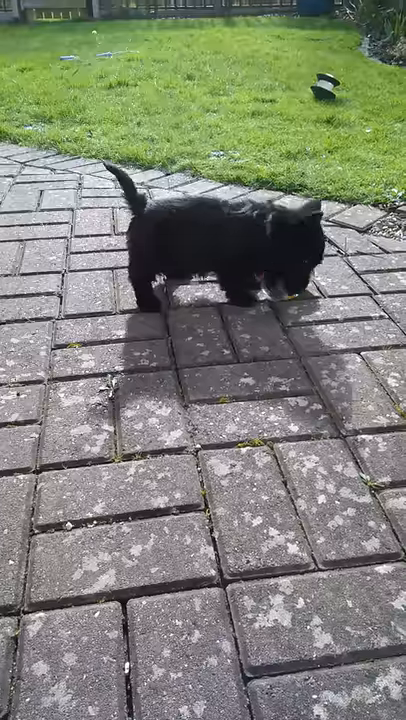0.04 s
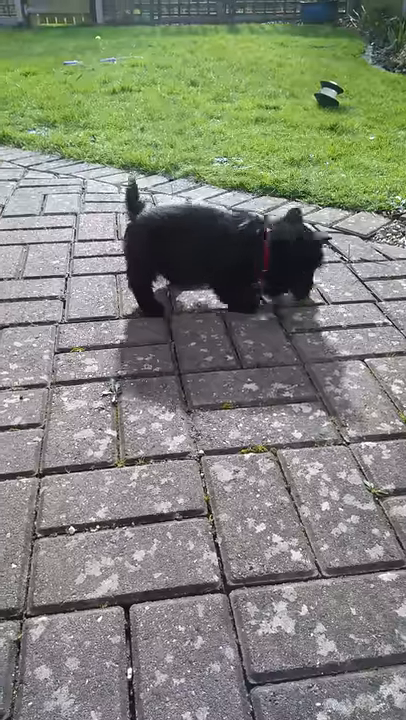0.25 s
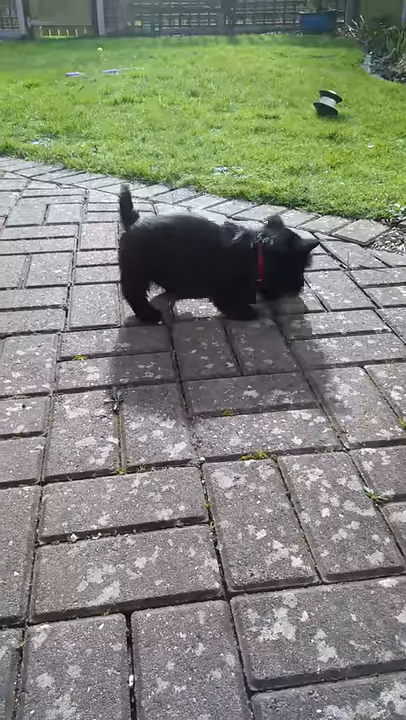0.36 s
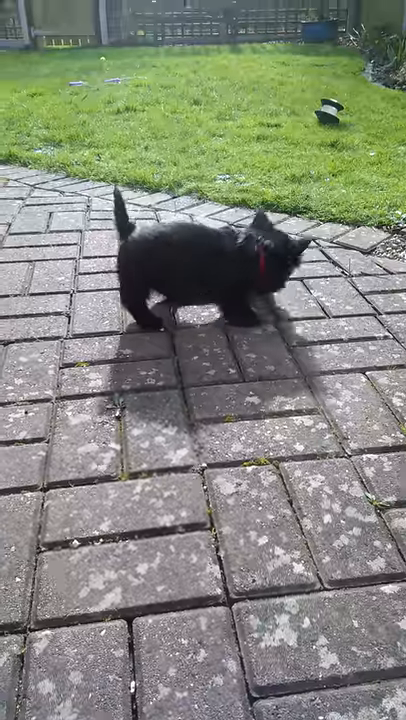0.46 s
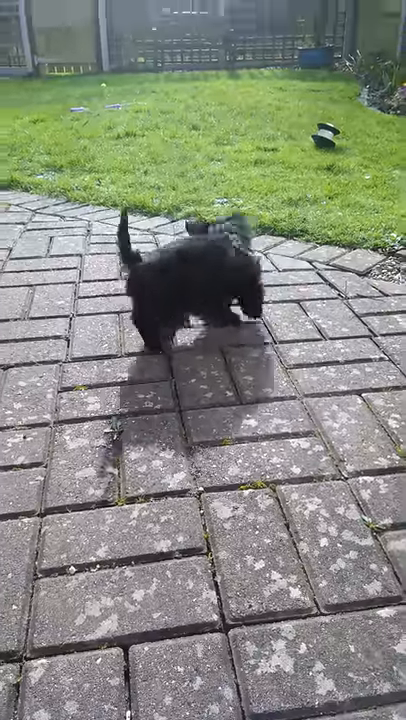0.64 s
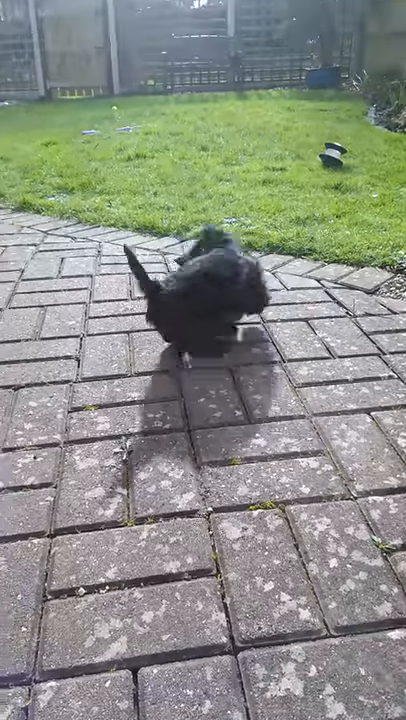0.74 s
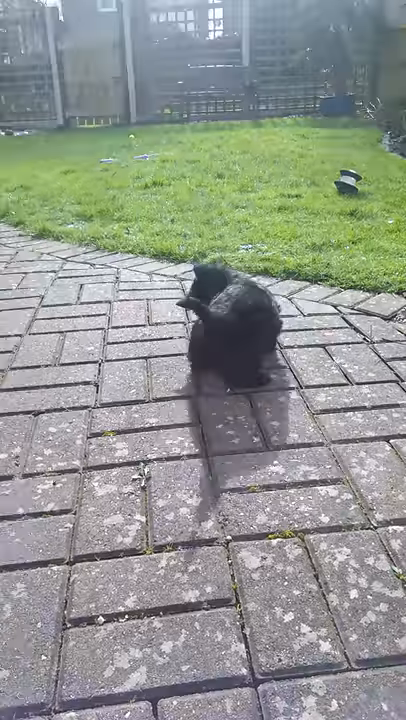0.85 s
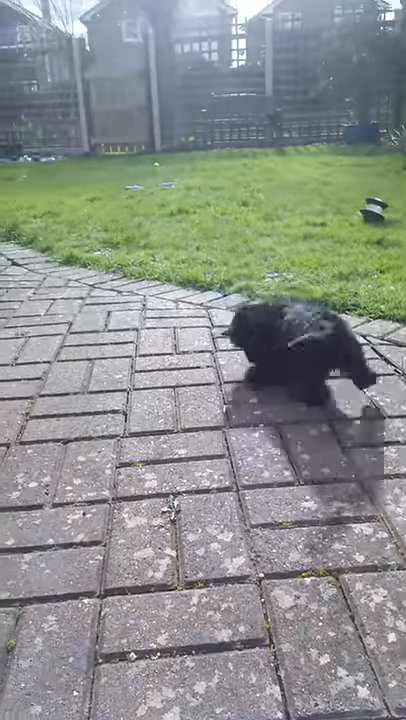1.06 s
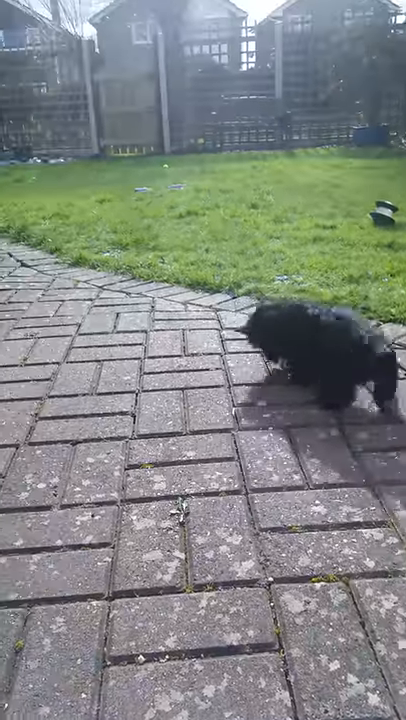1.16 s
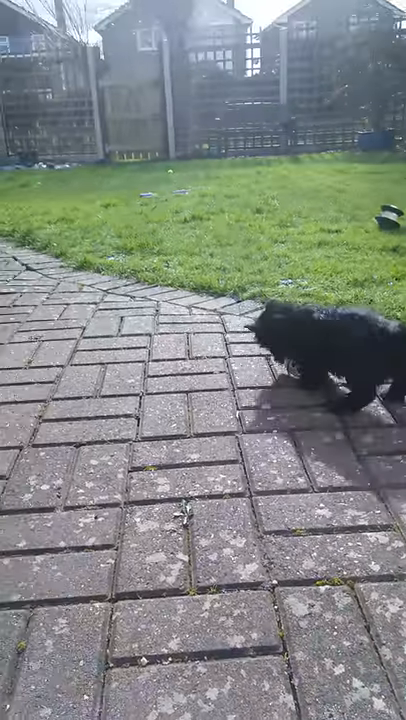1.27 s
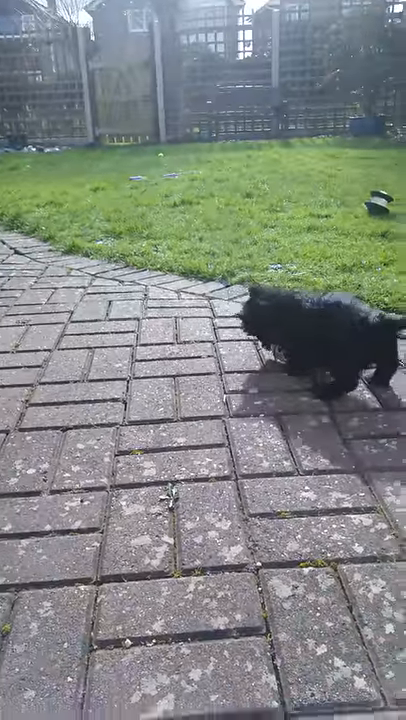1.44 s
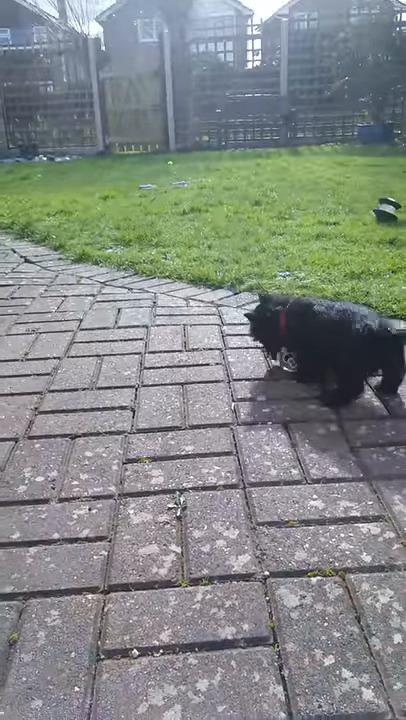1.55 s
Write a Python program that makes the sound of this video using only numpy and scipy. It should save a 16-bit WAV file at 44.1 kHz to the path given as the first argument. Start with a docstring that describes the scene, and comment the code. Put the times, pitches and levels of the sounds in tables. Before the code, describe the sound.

Close up in a garden, a metal can knocks and judders over gritty brick, pushed by a puppy. The rattling eases and resumes with small high clinks and soft scuffs, ending with a hollow bump and a short ping.

```python
"""Puppy shoving a can over brick

Close up, a metal can knocks and judders in stick-slip scrapes on a patio. Grit cracks under its rim,
a small loose metal piece clinks, soft scuffs follow, then a hollow bump and a ping.
Wall and garden fences give a short echo; a limiter squeezes the loudest blows."""
import sys
import numpy as np
from scipy import signal
from scipy.fft import rfft, irfft
from scipy.io import wavfile
from scipy.ndimage import uniform_filter1d, minimum_filter1d

SR = 44100
rng = np.random.default_rng(int(sys.argv[2]) if len(sys.argv) > 2 else 0)


def int16_out(signal):
    """Quantize to a 16-bit WAV file."""
    q = np.round(np.clip(np.atleast_2d(signal).T, -1, 1) * 32767)
    wavfile.write(sys.argv[1], SR, q.astype(np.int16))


N = 70560
RING_TIME_S = np.arange(SR // 2) / SR

# Modes of can, loose piece, bump and ping. Each row: frequency in Hz, level in dB, T60 in seconds.
CAN_MODES = [(322, -20.5, 0.13), (651.5, -2, 0.16), (695.8, -6.5, 0.17), (814, -13, 0.075),
             (921, 5.5, 0.14), (998, -7.5, 0.14), (1154, -23.5, 0.4), (1364, -0.5, 0.16), (1451, 3.5, 0.18),
             (1643.7, 0.5, 0.15), (1695, 1.5, .12), (2032, -2, 0.19), (2750, -25.5, 0.18), (3050, 0, 0.27),
             (3865, 4.5, 0.19), (4140, -12, 0.067), (4080, 2.5, 0.17), (4760, 4, .12), (5200, -6.5, 0.072)]
CLINK_MODES = [(4910, 3, 0.044), (6840, -9, 0.45), (7280, -5, 0.07), (8500, -9, .1), (14000, -11, .15)]
BUMP_MODES = [(359, -12.5, 0.065), (667, -16, 0.099), (922, 0.5, 0.045), (1100, 5.5, 0.014),
              (1185, -13, 0.15), (1520, -19, 0.059), (2100, -5, 0.029), (2430, -21.5, 0.097),
              (2750, -12, .06), (3600, -17, 0.063), (3720, -20, .06), (3950, -20, 0.087),
              (5140, -17.5, .05)]
PING_MODES = [(664, -26, 0.046), (990, -22, 0.058), (1400, -1.5, 0.05), (1457, -12, 0.18),
              (1620, -9, 0.027), (2070, -16.5, 0.043), (2270, -6.5, 0.017), (2600, -22, 0.11),
              (4800, -29, 0.03)]
# Noise spectra. Each row: frequency in Hz, relative density in dB.
WASH_SPECTRUM = [(120, -27), (250, -29), (340, -3), (520, -7), (850, 7.5), (1100, -2), (1400, 5.5),
                 (1750, 2), (2400, -8.5), (4700, -13), (7000, -15.5), (8200, -19.5), (9500, -17.5),
                 (11800, -23), (14100, -16), (15500, -26.5)]  # the can's dense weak modes
GRIT_SPECTRUM = [(1500, -13), (3000, -6.5), (3800, 0.5), (6000, -5), (8500, -0.5), (12000, -1),
                 (15500, 0.5)]
CLICK_SPECTRUM = [(1200, 2), (3500, 1), (5000, 12), (6700, 4), (8400, 11), (10500, 9.5), (12000, 3),
                  (15500, 2.5)]
SCUFF_SPECTRUM = [(50, -52.5), (150, -8), (260, -9), (370, 4), (560, -3.5), (750, -14.5), (1400, -14.5),
                  (3000, -45), (15000, -36.5)]
ECHO_SPECTRUM = [(100, 10), (700, -8), (1500, -11.5), (5000, -8.5), (15000, -10)]
AIR_SPECTRUM = [(30, 1), (150, -4), (600, 8), (2000, 8), (15000, -17.5)]
# Low, mid and treble bands of the can. Each row: lower and upper edge in Hz, wash against modes in dB,
# wash T60 in seconds.
CAN_BANDS = [(60, 1200, -9, 0.16), (1197, 2900, 3, 0.14), (2970, 16000, 10.5, 0.13)]
# Blows on the can. Each row: start in seconds, low, mid and treble level in dB, share left ringing,
# frequency favoured by the contact point in Hz, its boost in dB, wash offset in dB.
KNOCKS = [(.095, -47, -47.5, -79, 0.32, 880, 5.5, -6), (.181, -34.5, -42, -68, 0.6, 650, -8, 5),
          (.187, -26, -28.5, -51, 1, 918, 2, -12), (.201, -16.5, -21.5, -40, 1, 918, 8, -14),
          (.217, -20, -22, -26.5, 0.9, 1648, 12, -9), (.223, -16, -18, -30, 1, 1648, 17, 3),
          (.232, -13.5, -12.5, -33, 1, 918, 1, 1.5), (.260, -12, -14, -28, 1, 918, 15, -2.5),
          (.268, -5.5, -17.5, -26.5, 0.86, 974, 30, -15.5), (.284, -22.5, -20.5, -36, 0.35, 980, -7, 6),
          (.331, -15.5, -18, -33, 1, 918, 0, -8.5), (.347, -12.5, -30, -54, 0.9, 918, 27, -8),
          (.367, -9, -10.5, -16, 1, 1689, 20, -2), (.378, -11, -10, -20, 1, 1010, 12.5, -4.5),
          (.392, -4, -23, -20, 0, 985, 20, -16), (.411, -16, -16.5, -23, 0.5, 1760, 2, 16.5),
          (.436, -9, -7.5, -16, 0.9, 647, 15, 0), (.445, -43, -9.5, -12, 0.45, 1697, 20, -8),
          (.453, -27, -17, -35, 0.5, 670, -6, 12), (.469, -16.5, -30, -34, 0.1, 1452, 9, -1.5),
          (.489, -15, -21.5, -45, 0.76, 918, 21, -2.5), (.517, -17, -28, -43, 0.07, 810, 16, -1),
          (.560, -20.5, -38.5, -59, 0.84, 815, 16.5, 11.5), (.605, -14, -32, -34.5, 1, 918, 12.5, 1.5),
          (.629, -21.5, -40, -37, 0.9, 1170, 1, 7), (.652, -18, -27, -40, 1, 918, 9, -26),
          (.667, -22, -31, -49, 0.8, 940, 28, -27), (.691, -53, -25.5, -41, 0.95, 1648, 9, -2),
          (.747, -21, -27.5, -46, 1, 918, 1.5, -8), (.764, -27.5, -48, -35.5, 1, 1452, 10, 0.5),
          (.881, -18, -37, -42.5, .95, 918, -3, -4.5), (.904, -17, -38, -51, 1, 875, 24, 4.5),
          (.924, -27.5, -25, -41, 1, 1380, 10, -0.5), (.945, -27.5, -25, -26.5, 1, 1370, 11, 11),
          (1.012, -18, -40, -36, .7, 646, 8, 12), (1.021, -21.5, -24.5, -48, .3, 1170, 5, 8),
          (1.046, -13.5, -17, -26.5, 0.67, 1005, 16.5, -1), (1.072, -24, -26, -32.5, 0.7, 655, 24, 11),
          (1.092, -21, -38, -41, 0.55, 650, 23, 6), (1.125, -34, -16.5, -28.5, 0.09, 1678, 26, -4.5),
          (1.449, -52, -48, -58, 0, 1648, 0, 4.5), (1.509, -53, -54, -66, 0.1, 918, 1, -5)]
# Rim on brick. Each row: start and length in seconds, low, mid and treble level in dB,
# level change along the scrape in dB.
SCRAPES = [(0.204, 0.067, -27, -21.5, -29.5, -6), (0.336, 0.074, -21, -21, -32.5, 1),
           (0.439, 0.086, -26, -22, -37, 5), (.53, 0.18, -27.5, -28, -38.5, -10.5),
           (0.747, 0.031, -26.5, -24, -39, -29), (0.887, .11, -34.5, -33, -43, -2.5),
           (0.998, 0.12, -27.5, -27.5, -37.5, -10), (1.117, 0.099, -53, -38.5, -44, 3)]
# Grit under the rim. Each row: start in seconds, level in dB, T60 in seconds.
GRIT_CRACKS = [(.216, -29, .04), (.232, -33, .03), (.259, -27, .025), (.284, -38.5, .025),
               (.320, -31.5, .012), (.368, -31, .05), (.378, -31.5, .04), (.445, -38, .05),
               (.747, -28, .06), (1.4094, -26, .034)]
# Touches of the loose piece. Each row: start in seconds, click and ring level in dB, favoured Hz.
CLINKS = [(0.93, -39, -60, 14000), (0.9441, -20, -25.5, 7350), (.970, -29.5, -36.5, 6832),
          (1.001, -36, -37, 6832), (1.0308, -20.5, -28.5, 6832), (1.071, -34, -33, 7350),
          (1.089, -30.5, -48, 7350), (1.1093, -29.5, -30.5, 7350), (1.127, -54, -42, 7350),
          (1.148, -38, -52, 7350), (1.167, -40, -54, 14000), (1.184, -41.5, -60, 5010),
          (1.201, -44, -52.5, 5010), (1.214, -39, -47, 5010), (1.228, -49, -94, 5010),
          (1.322, -50, -68, 5010)]
# Rubs on the paving. Each row: start and length in seconds, level in dB.
SCUFFS = [(.975, 0.048, -36), (1.166, 0.071, -36), (1.455, 0.099, -46.5), (1.52, 0.092, -46)]


def undb(db):
    return 10 ** (np.asarray(db) / 20)


def rms(x):
    return np.sqrt(np.mean(x ** 2) + 1e-18)


def decay(t60_s):
    return np.exp(-np.log(1000) * RING_TIME_S / np.maximum(t60_s, 1e-3))


def trapezoid(length_s, edge_s):
    return np.clip(np.minimum(RING_TIME_S, length_s - RING_TIME_S) / edge_s, 0, 1)


def at_level(x, db):
    """Scales x so its first 10 ms have the given RMS level."""
    return x * undb(db) / rms(x[:SR // 100])


def noise(spectrum, low_hz=0, high_hz=SR, size=len(RING_TIME_S)):
    """Shaped noise of unit RMS."""
    bins_hz = np.fft.rfftfreq(size, 1 / SR) + 1
    hz, db = np.array(spectrum, float).T
    gain = undb(np.interp(np.log(bins_hz), np.log(hz), db))
    in_band = (bins_hz > low_hz) & (bins_hz < high_hz)
    x = irfft(rfft(rng.standard_normal(size)) * gain * in_band, size)
    return x / rms(x)


def add(out, start_s, x):
    i = max(int(start_s * SR), 0)
    out[i:i + len(x)] += x[:max(N - i, 0)]


def can_rings(pitch_spread, wash_db, favoured_hz=0, boost_db=0, boost_width_hz=44.7, scatter_db=2.5):
    """One tap's response per band: clear modes, detuned as the can is pressed, in a wash of weak ones."""
    hz, db, t60_s = np.array(CAN_MODES).T
    db = db + boost_db * np.exp(-((hz - favoured_hz) / boost_width_hz) ** 2)
    db += scatter_db * rng.standard_normal(len(hz))
    bent_hz = hz * (1 + pitch_spread * rng.standard_normal(len(hz)))
    modes = undb(db)[:, None] * np.sin(2 * np.pi * bent_hz[:, None] * RING_TIME_S) * decay(t60_s[:, None])
    modes[::2] *= -1
    rings = []
    for low_hz, high_hz, band_wash_db, wash_t60_s in CAN_BANDS:
        clear = modes[(hz >= low_hz) & (hz < high_hz)].sum(0)
        wash = noise(WASH_SPECTRUM, low_hz, high_hz) * decay(wash_t60_s)
        rings.append(at_level(clear, 0) + at_level(wash, band_wash_db + wash_db))
    return rings


def knocks(contact_s=0.0013, damped_t60_s=0.044):
    """Each blow rings the can; brick and muzzle quickly damp part of the ring."""
    out = np.zeros(N)
    attack = np.minimum(RING_TIME_S / contact_s, 1)
    for start_s, *bands_db, ringing_share, favoured_hz, boost_db, wash_db in KNOCKS:
        envelope = attack * (ringing_share + (1 - ringing_share) * decay(damped_t60_s))
        rings = can_rings(pitch_spread=0.0066, wash_db=wash_db, favoured_hz=favoured_hz, boost_db=boost_db)
        add(out, start_s, sum(at_level(ring * envelope, db) for ring, db in zip(rings, bands_db)))
    return out


def scrapes(slips_per_s=420, scatter_db=4.5):
    """The rim sticks and slips on brick: a burst of uneven taps into the can."""
    out, size = np.zeros(N), len(RING_TIME_S)
    for start_s, length_s, *bands_db, change_db in SCRAPES:
        slips = rng.random(size) < slips_per_s / SR
        strength = undb(scatter_db * rng.standard_normal(size))
        trend = undb(change_db * np.minimum(RING_TIME_S / length_s, 1))
        force = slips * strength * trapezoid(length_s, edge_s=0.007) * trend
        for ring, db in zip(can_rings(pitch_spread=0.017, wash_db=2), bands_db):
            judder = signal.fftconvolve(force, ring)
            add(out, start_s, judder * undb(db) / rms(judder[:int(length_s * SR)]))
    return out


def grit(tail_db=-13, tail_t60_s=0.16):
    """Grit cracks under the rim: bright bursts with a short sandy tail."""
    out = np.zeros(N)
    for start_s, db, t60_s in GRIT_CRACKS:
        envelope = decay(t60_s) + undb(tail_db) * decay(tail_t60_s)
        add(out, start_s, at_level(noise(GRIT_SPECTRUM) * envelope, db))
    return out


def clinks(click_t60_s=0.027, tail_db=-18, tail_t60_s=0.13, boost_db=12, ring_s=0.041, fade_s=0.013):
    """The loose piece clicks and gives a thin high ring, cut short after a brief set time."""
    out = np.zeros(N)
    click_envelope = decay(click_t60_s) + undb(tail_db) * decay(tail_t60_s)
    fade_out = np.clip((ring_s - RING_TIME_S) / fade_s, 0, 1)
    for start_s, click_db, ring_db, favoured_hz in CLINKS:
        ring = 0
        for hz, db, t60_s in CLINK_MODES:
            favoured = abs(hz / favoured_hz - 1) < 0.04
            tone = np.sin(2 * np.pi * hz * (start_s + RING_TIME_S))
            ring += undb(db + boost_db * favoured) * tone * decay(t60_s)
        click = noise(CLICK_SPECTRUM) * click_envelope
        add(out, start_s, at_level(click, click_db) + at_level(ring * fade_out, ring_db))
    return out


def scuffs():
    """Dull, soft rubs on the paving."""
    out = np.zeros(N)
    for start_s, length_s, db in SCUFFS:
        add(out, start_s, undb(db) * noise(SCUFF_SPECTRUM) * trapezoid(length_s, edge_s=0.013))
    return out


def lone_knock(modes, start_s, level_db, contact_s=0.0017, crack_db=-11, crack_t60_s=0.096):
    """One clean blow: a few modes and a brief crack."""
    out = np.zeros(N)
    ring = sum(undb(db) * np.sin(2 * np.pi * (hz * RING_TIME_S + rng.random())) * decay(t60_s)
               for hz, db, t60_s in modes)
    crack = noise(WASH_SPECTRUM) * decay(crack_t60_s)
    attack = np.minimum(RING_TIME_S / contact_s, 1)
    blow = (at_level(ring, 0) + at_level(crack, crack_db)) * attack
    add(out, start_s, at_level(blow, level_db))
    return out


def garden_echo(x, level_db=-15, t60_s=0.39, delay_s=0.013):
    """Scattered echo from house wall and fences."""
    tail = noise(ECHO_SPECTRUM) * decay(t60_s) * (RING_TIME_S > delay_s)
    return undb(level_db) * signal.fftconvolve(x, tail / np.linalg.norm(tail))[:N]


def scene(mic_low_cut_hz=203, air_db=-76.5):
    """Close sounds and their echo through a microphone with little bass, over faint air."""
    near = knocks()
    near += lone_knock(BUMP_MODES, start_s=1.2865, level_db=-20.5)
    near += lone_knock(PING_MODES, start_s=1.3835, level_db=-21.5)
    near += scrapes() + grit() + clinks() + scuffs()
    low_cut = signal.butter(3, mic_low_cut_hz, "high", fs=SR, output="sos")
    thin = signal.sosfilt(low_cut, near + garden_echo(near))
    air = undb(air_db) * noise(AIR_SPECTRUM, size=N)
    return (thin + air)[None]


def record(dry, hold_s=0.0027, ceiling=0.71, skew=0.01, high_cut_hz=15800):
    """Fast full-scale limiter, slightly lopsided soft clipping, treble cut."""
    hold_samples = int(hold_s * SR)
    held_gain = minimum_filter1d(1 / np.maximum(abs(dry), 1), hold_samples)
    limited = dry * uniform_filter1d(held_gain, hold_samples)
    clipped = limited / (1 + (limited / ceiling) ** 6) ** (1 / 6)
    high_cut = signal.ellip(10, 0.2, 70, high_cut_hz, fs=SR, output="sos")
    return signal.sosfilt(high_cut, clipped + skew * clipped ** 2)


dry = scene()
out = record(dry)
int16_out(out)
```